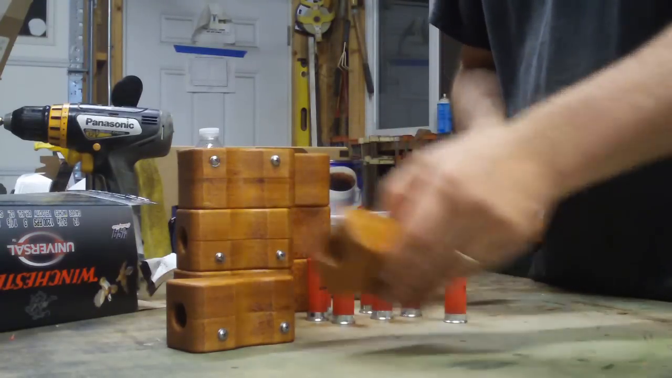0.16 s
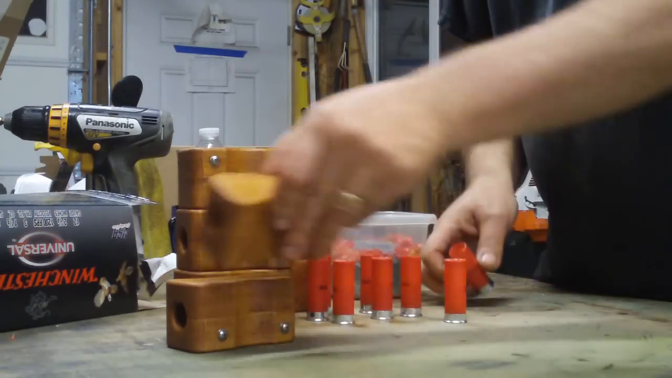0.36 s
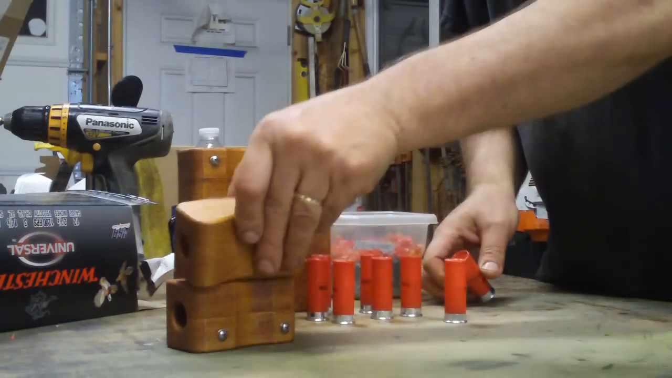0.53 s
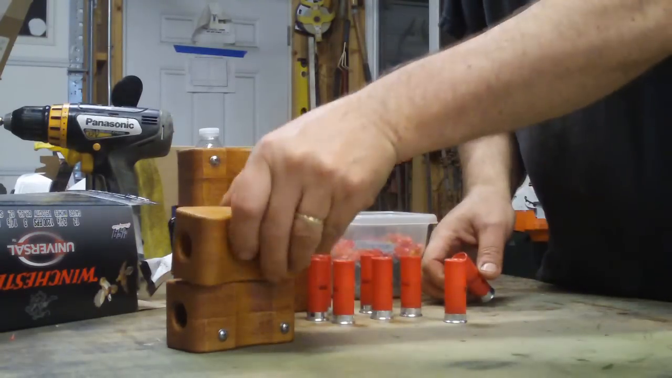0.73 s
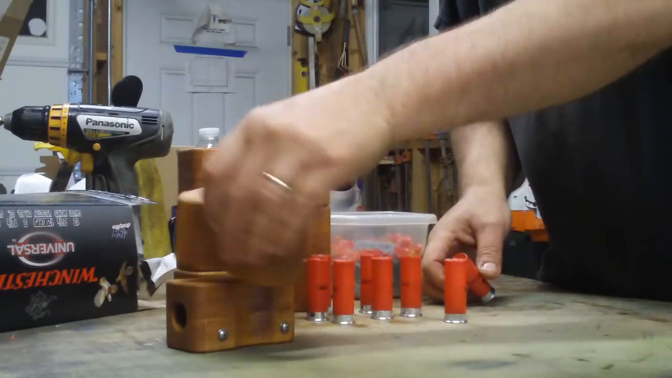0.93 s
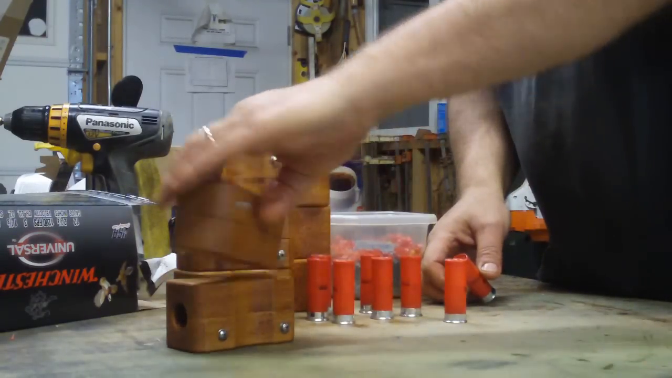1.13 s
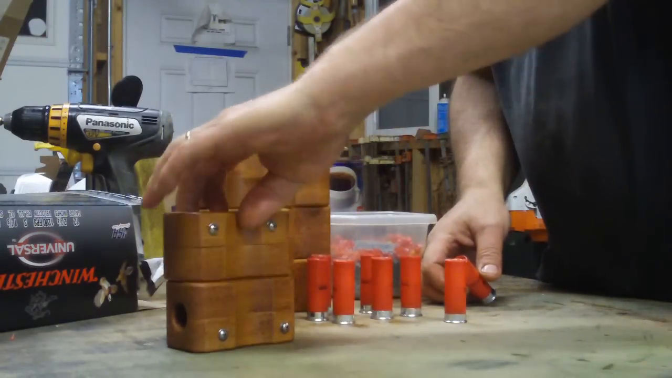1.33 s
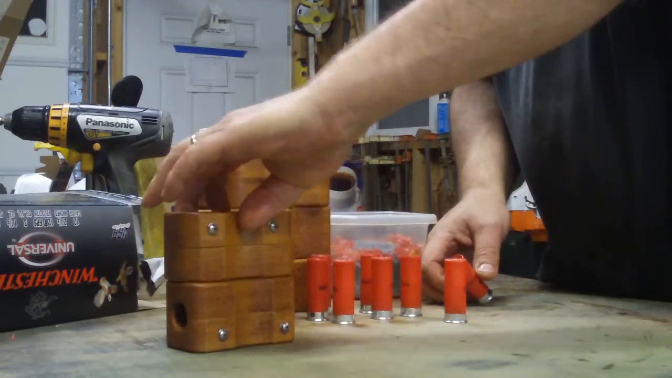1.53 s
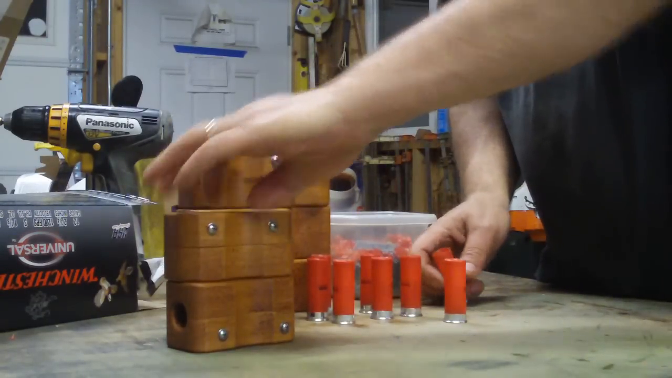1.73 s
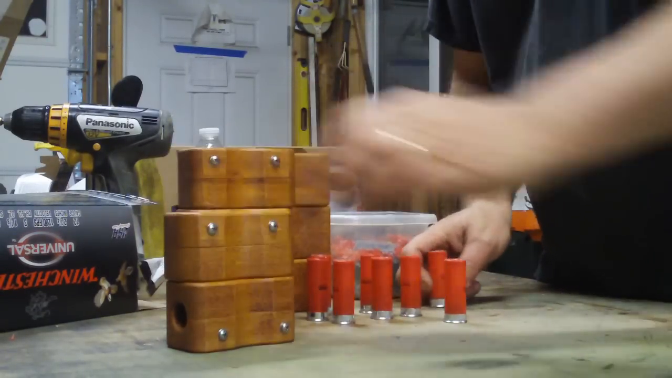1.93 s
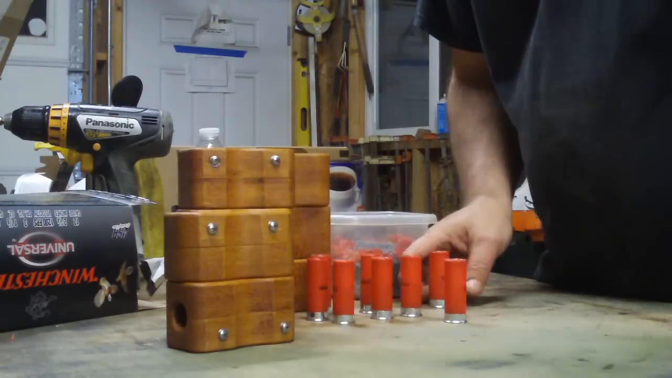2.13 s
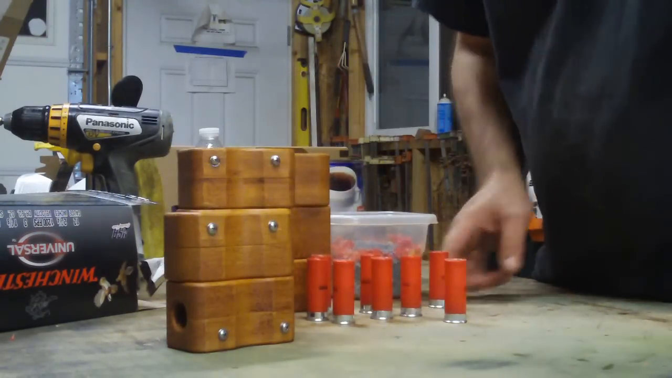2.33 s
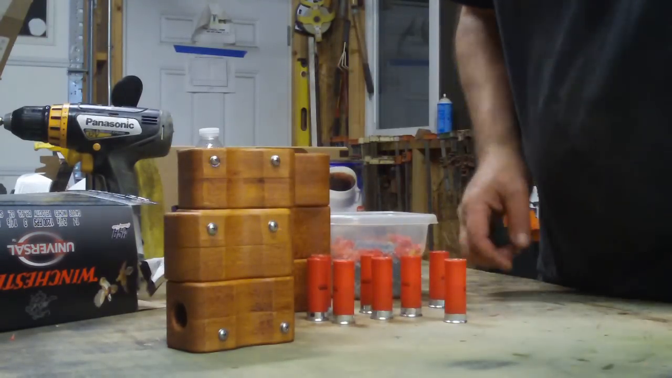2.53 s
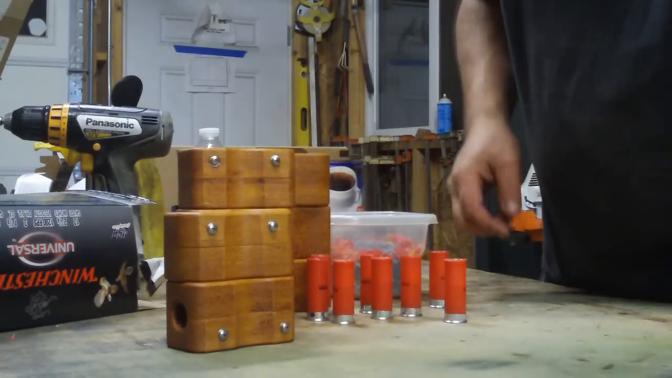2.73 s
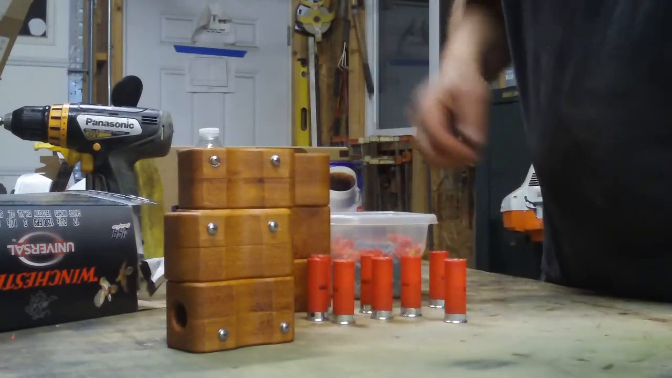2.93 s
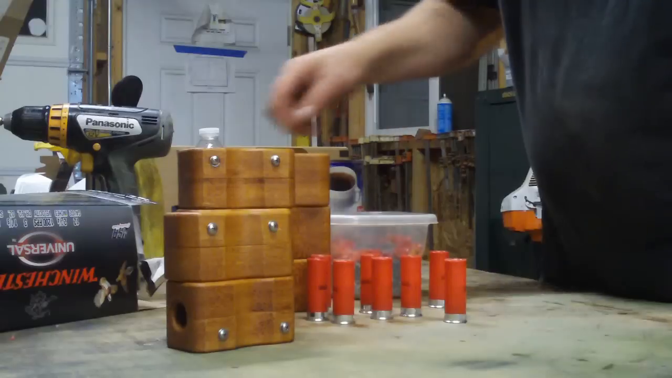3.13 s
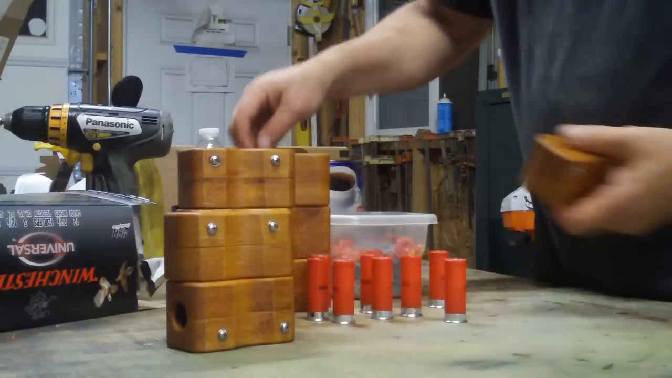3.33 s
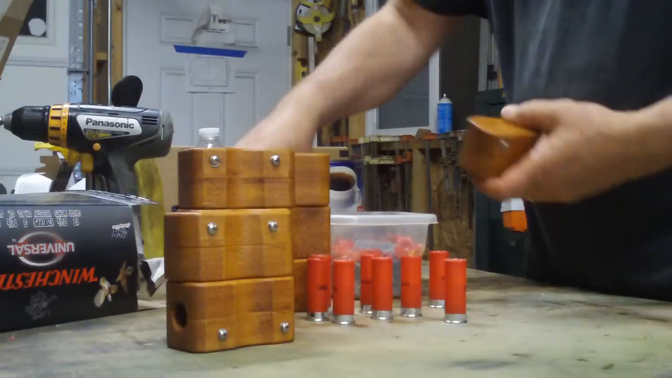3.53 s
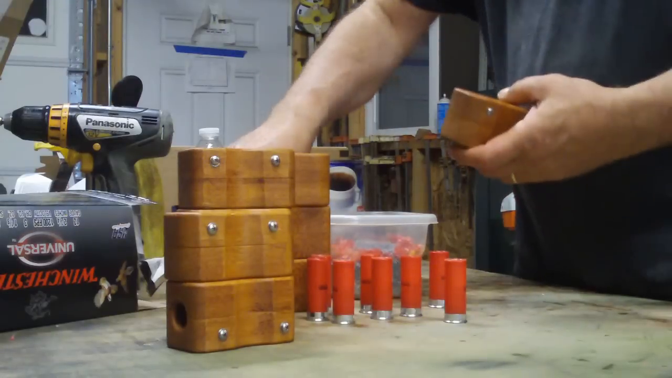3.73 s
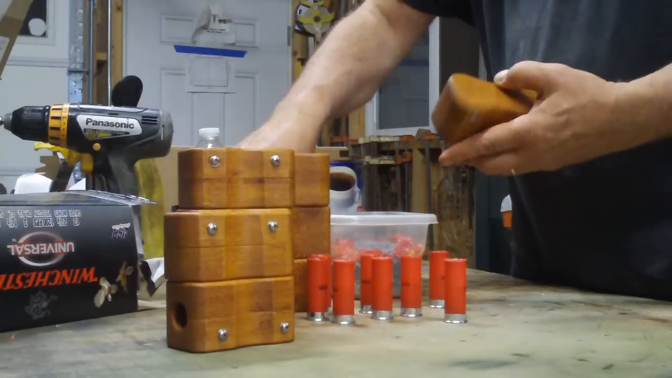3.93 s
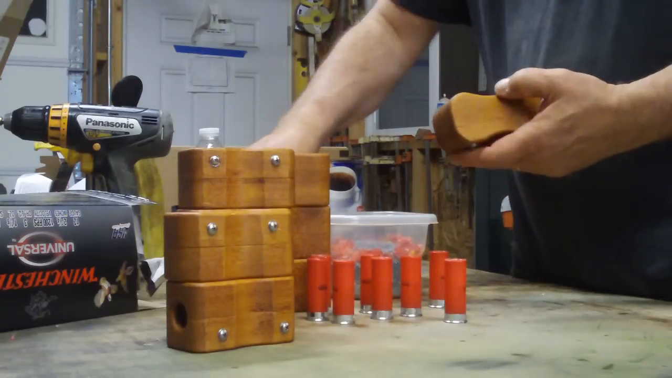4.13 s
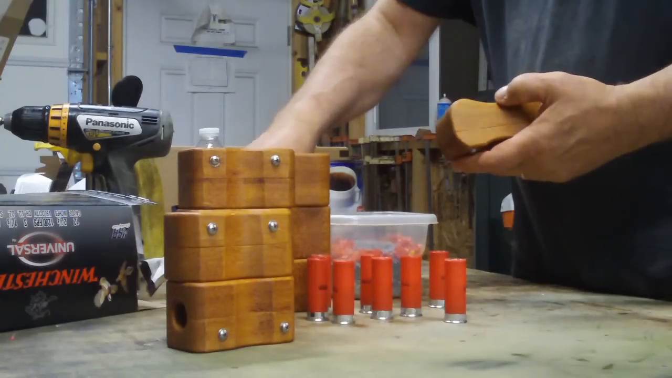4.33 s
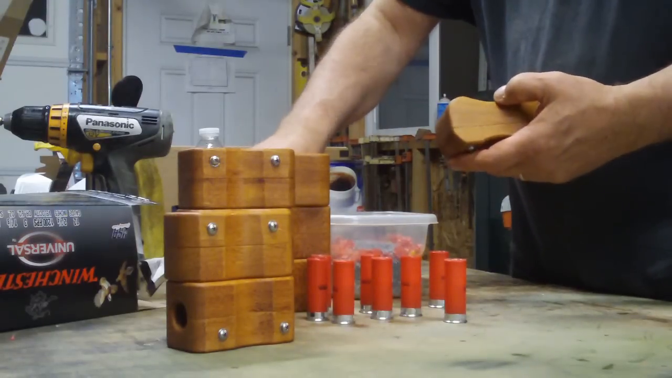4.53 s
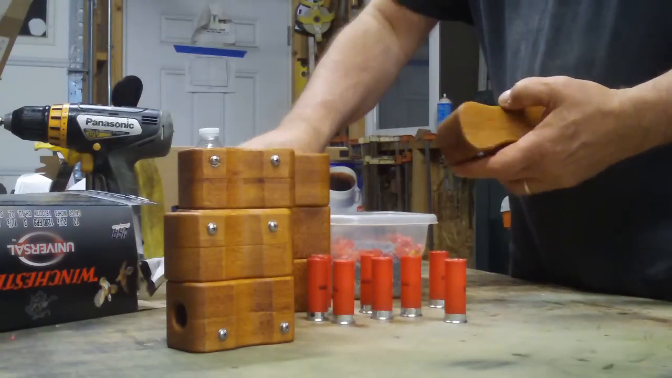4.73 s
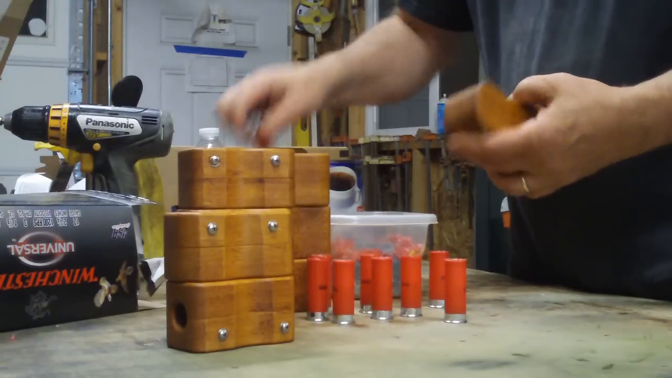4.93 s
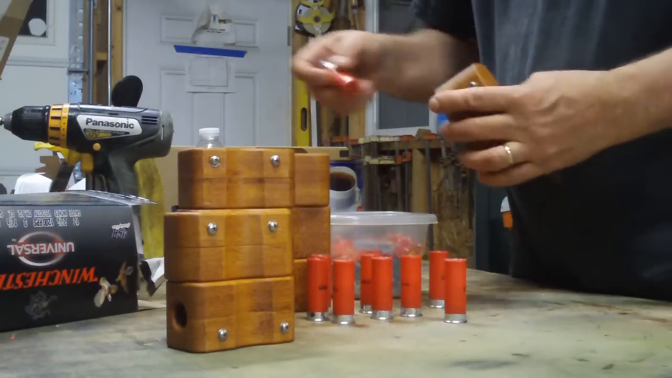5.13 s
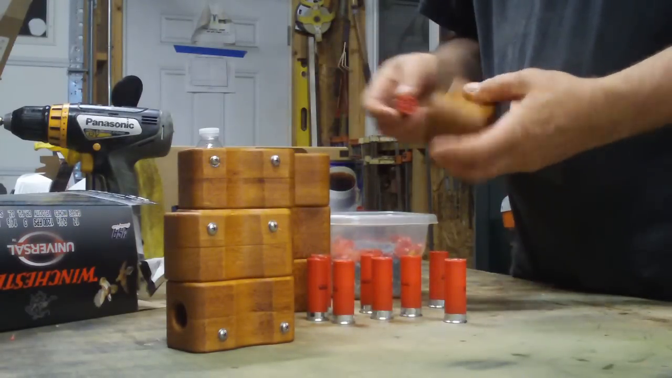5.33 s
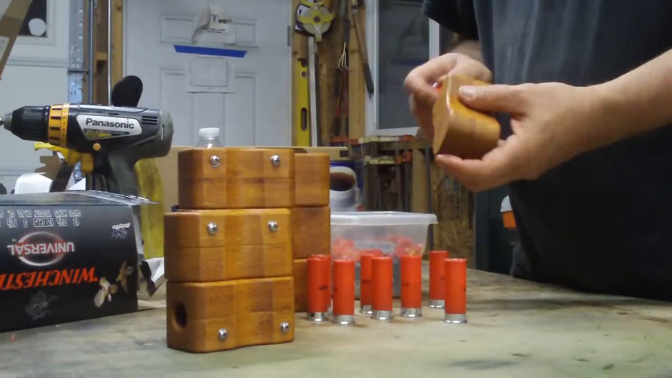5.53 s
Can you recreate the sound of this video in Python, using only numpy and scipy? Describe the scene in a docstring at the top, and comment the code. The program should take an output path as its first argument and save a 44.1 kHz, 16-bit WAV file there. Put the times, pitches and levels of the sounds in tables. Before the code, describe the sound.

Close stereo microphone at a bench in a small workshop. After a quiet start, two dull wooden knocks, then a very loud, sharp block-on-block clack with a quick rebound, short and slightly clipped. A light plastic shell taps down on the bench. Then much quieter: a block drags and bumps off a shelf, fingers rub and rummage in a plastic tub, with faint brass ticks over low room rush.

```python
"""On a workbench, hardwood blocks are stacked: two dull knocks, then a sharp clack and its rebound.
A shotgun shell is stood on the bench, another block is dragged off a shelf, and fingers fish a shell from
a plastic tub. Each blow sums damped modes of the object and the bench, softened by the contact;
sliding is shaped noise. The bench sways, a small workshop answers, and the loudest peaks clip flat."""
import sys
import numpy as np
from scipy import signal
from scipy.fft import rfft, irfft, next_fast_len
from scipy.io import wavfile
from scipy.ndimage import map_coordinates

SR = 44100
rng = np.random.default_rng(int(sys.argv[2]) if len(sys.argv) > 2 else 0)


def unload_audio(sound):
    """Save the sound as a 16-bit wav file, at the path given as the first command line argument."""
    columns = np.transpose(np.atleast_2d(sound))
    # keep every value between -1 and 1, then stretch to whole-number steps
    steps = np.round(np.clip(columns, -1, 1) * 32767)
    wavfile.write(sys.argv[1], SR, steps.astype(np.int16))


N = 245637

# Block striking block: (time [s], level [dB], contact lowpass [Hz], bench level re block [dB],
# bench tilt [dB/octave], room level [dB])
KNOCKS = [(0.6619, -7.5, 1520, -3.5, 1, -8.5), (0.7757, -4.5, 1350, -8.5, 6.5, -8),
          (0.935, -35.5, 900, 2, -2.5, -0.5), (1.3947, -11.5, 9000, -28, 11.5, -8.5),
          (1.3972, 4, 8000, -21, -3.5, -10.5), (1.4394, 1.5, 2820, -23, -2.5, -3.5),
          (1.476, -18, 2200, 0.5, 9, 0)]
# Spectrum of the bench top's low rumble: (frequency [Hz], relative level [dB per Hz])
THUD_SPECTRUM = [(25, -17.5), (45, 0.5), (85, 5.5), (140, -9.5), (250, -16.5), (600, -85)]


def amp(db):
    """Level law: decibels to amplitude gain."""
    return 10 ** (np.asarray(db) / 20)


def unit(x):
    """Power normalization: the signal scaled to rms 1."""
    return x / np.sqrt(np.mean(x ** 2) + 1e-20)


def along(points, hz):
    """Logarithmic frequency scale: (Hz, value) points interpolated on it."""
    f, v = np.transpose(points)
    return np.interp(np.log(hz + 1), np.log(f + 1), v)


def wobble(rate):
    """Slow random modulation: a smooth curve through `rate` random knots a second."""
    knots = rng.standard_normal(int(N * rate / SR) + 4)
    return map_coordinates(knots, [np.arange(N) * rate / SR])


def filtered(x, response):
    """Linear filtering: the spectrum multiplied by a response of frequency."""
    n = x.shape[-1]
    padded = next_fast_len(n + SR // 4)
    spectrum = rfft(x, padded) * response(np.fft.rfftfreq(padded, 1 / SR))
    return irfft(spectrum, padded)[..., :n]


def add(track, s, sound):
    """Superposition: a sound is summed into the track from time s."""
    part = track[..., round(s * SR):][..., :sound.shape[-1]]
    part += sound[..., :part.shape[-1]]


def noise(spectrum):
    """Spectral shaping: white noise coloured by a spectrum, at rms 1."""
    return unit(filtered(rng.standard_normal(N), lambda hz: amp(along(spectrum, hz))))


def swell(s, length, attack, release):
    """Pressure envelope of a hand: it builds, holds and dies away exponentially."""
    t = np.arange(N) / SR - s
    return np.clip(t / attack, 0, 1) * amp(-60 * np.maximum(t - length, 0) / release)


def ring(modes, tilt_db=0, scatter_db=-2.2):
    """Modal superposition: damped sines after one blow, tilted per octave about their middle."""
    t = np.arange(SR // 5) / SR
    hz, db, t60 = np.transpose(modes)[:, :, None]
    octaves = np.log2(hz) - np.log2(hz).mean()
    # each blow excites the modes in slightly different proportions
    level = db + tilt_db * octaves + scatter_db * rng.standard_normal(hz.shape)
    sign = (-1) ** np.arange(len(hz))[:, None]
    return np.sum(sign * amp(level - 60 * t / t60) * np.sin(2 * np.pi * hz * t), axis=0)


def crack(db, t60, edge_hz):
    """High modal density: the crowded, quickly dying modes of a contact behave as decaying noise."""
    t = np.arange(SR // 5) / SR
    lowpass = signal.butter(4, min(edge_hz, SR / 3), fs=SR, output="sos")
    grit = signal.sosfilt(lowpass, rng.standard_normal(len(t)))
    return unit(grit) * amp(db - 60 * t / t60)


def in_room(sound, room_db, scattered=0, build=0.0092, ring_db=-1.5):
    """Reverberation: a sound plus the diffuse echo of part of its ring and of its sideways click."""
    # (frequency [Hz], reverberation time t60 [s])
    room_decay = [(100, 0.6), (400, 0.32), (1200, 0.41), (4000, 0.44), (8000, .15)]
    # (frequency [Hz], echo level [dB])
    room_colour = [(60, -5.5), (200, 0.5), (450, 6.5), (1050, -2.5), (2300, -4), (3300, -8.5), (4900, -5.5),
                   (5300, -42.5), (7000, -24), (12000, -27.5)]
    hz, t, z = signal.stft(rng.standard_normal(SR * 3 // 4), SR, nperseg=256)
    decay = amp(-60 * t / along(room_decay, hz)[:, None])
    fade = decay * (1 - np.exp(-t / build))
    colour = amp(along(room_colour, hz))[:, None]
    tail = signal.istft(z * fade * colour, SR, nperseg=256)[1]
    radiated = amp(ring_db) * sound + scattered
    out = amp(room_db) * signal.fftconvolve(radiated, tail) / np.sqrt(SR / 40)
    add(out, 0, sound)
    return out


def blows(rows, modes, crack_db, crack_t60, crack_hz, click_db, click_hz):
    """Impact excitation: each blow rings the object and the bench; a softer contact is duller."""
    # Bench top modes: (frequency [Hz], level [dB], t60 [s])
    bench_modes = [(143, -5.5, 0.067), (224, 1, 0.075), (356, -1, 0.03), (456, -4, 0.048),
                   (671, -10.5, 0.04), (849.5, -18, 0.14)]
    out = np.zeros(N)
    impulse = amp(click_db) * signal.unit_impulse(SR // 5)
    click = signal.lfilter(*signal.butter(1, min(click_hz, SR / 3), fs=SR), impulse)
    for s, db, bright_hz, bench_db, tilt_db, room_db in rows:
        contact = signal.butter(2, min(bright_hz, SR / 3), fs=SR)
        body = ring(modes) + crack(crack_db, crack_t60, crack_hz)
        body = body + amp(bench_db) * ring(bench_modes, tilt_db)
        body, scattered = signal.lfilter(*contact, [body, click])
        add(out, s, amp(db) * in_room(body, room_db, scattered))
    return out


def seated(rows, bench_db, tilt_db, room_db):
    """Common transmission path: bumps at one spot share their way into the bench and the room."""
    return [(*row, bench_db, tilt_db, room_db) for row in rows]


def block_knocks():
    """Impact of solid wood: short modes ring as block meets block."""
    # (frequency [Hz], level [dB], t60 [s])
    block_modes = [(822, -10.5, 0.013), (1000, -2.5, 0.025), (1132, -2, 0.017), (1274, -9.5, 0.03),
                   (1562, -8, 0.018), (2070, -7, 0.025), (2340, -7.5, 0.0076), (2606, -11, 0.015),
                   (3650, -13.5, 0.017), (3820, -12.5, 0.006), (4650, -25.5, .014), (6500, -39, 0.011),
                   (8700, -28, 0.018), (12400, -24.5, .006)]
    return blows(KNOCKS, block_modes, crack_db=-17.5, crack_t60=0.011, crack_hz=4300,
                 click_db=30.5, click_hz=1550)


def shell_taps():
    """Impact of a light body: shells tap on the bench and in the hand."""
    # (time [s], level [dB], contact lowpass [Hz])
    taps = [(1.745, -44, 2510), (2.0146, -15, 2330), (2.0192, -27.5, 2000), (4.9435, -43.5, 2990),
            (5.519, -51.5, 2500)]
    # (frequency [Hz], level [dB], t60 [s])
    shell_modes = [(940, -9, 0.15), (1250, -8, 0.046), (1608, 0.5, 0.038), (1784, 2.5, 0.052),
                   (2077, 2, 0.039), (2910, -7, 0.046), (3260, 0.5, 0.013)]
    return blows(seated(taps, bench_db=-17, tilt_db=-3, room_db=-8), shell_modes,
                 crack_db=-0.5, crack_t60=0.048, crack_hz=2470, click_db=35.0, click_hz=2000)


def shelf_bumps():
    """Hollow resonance: a block bumping off a shelf excites the shelf's modes."""
    # (time [s], level [dB], contact lowpass [Hz])
    bumps = [(2.869, -27, 1300), (2.883, -30, 1200), (2.897, -24.5, 1800), (2.907, -27, 604)]
    # (frequency [Hz], level [dB], t60 [s])
    shelf_modes = [(349, -9.5, 0.19), (410, -1, 0.021), (680, -16, 0.034), (1120, -11, 0.03),
                   (1427, -7.5, 0.045), (2150, -15, 0.037)]
    return blows(seated(bumps, bench_db=-5, tilt_db=1.5, room_db=-8.5), shelf_modes,
                 crack_db=-30, crack_t60=0.054, crack_hz=3000, click_db=31, click_hz=900)


def tub_bumps():
    """Thin-wall resonance: shells bumping in the plastic tub excite its modes."""
    # (time [s], level [dB], contact lowpass [Hz])
    bumps = [(3.726, -38.5, 2020), (3.746, -35.5, 1990), (4.110, -38.5, 1774), (4.174, -42, 1800),
             (4.2755, -39.5, 4986), (4.381, -39.5, 2500), (4.510, -33, 594), (4.5548, -18.5, 2000),
             (4.5592, -17, 2430), (4.566, -28, 1720), (4.592, -29.5, 600), (5.097, -30, 1390),
             (5.200, -38, 1960)]
    # (frequency [Hz], level [dB], t60 [s])
    tub_modes = [(451, -9.5, 0.15), (530, -10, 0.097), (813, -4, 0.08), (900, -4, 0.013), (1124, -2, 0.04),
                 (1414, -4.5, 0.036), (1840, -6.5, 0.024), (2500, -17, 0.057)]
    return blows(seated(bumps, bench_db=-11, tilt_db=0, room_db=-12.5), tub_modes,
                 crack_db=-4.5, crack_t60=0.06, crack_hz=2400, click_db=42.5, click_hz=1900)


def clinks():
    """Cushioned metal impact: brass heads tick, each pitched a little apart, their onset softened by the hull."""
    # (time [s], level [dB])
    ticks = [(4.548, -28), (4.561, -22.5), (4.567, -24.5), (4.595, -33.5), (4.74, -29), (4.754, -35.5),
             (4.764, -33), (4.779, -31), (5.144, -26.5), (5.160, -33), (5.176, -41), (5.530, -42)]
    # (frequency [Hz], level [dB], t60 [s])
    brass_modes = [(3630, 3.5, 0.015), (3980, -6.5, 0.021), (3856, -14.5, 0.055), (4260, -9.5, 0.04),
                   (4564, -5, 0.028)]
    attack_s, detune = 0.00073, 0.025  # time constant of the rise; relative spread of pitch
    out = np.zeros(N)
    for (s, db), chance in zip(ticks, rng.standard_normal(len(ticks))):
        modes = [(hz * (1 + detune * chance), level, t60) for hz, level, t60 in brass_modes]
        tick = ring(modes, scatter_db=3)
        tick *= 1 - np.exp(-np.arange(len(tick)) / SR / attack_s)
        add(out, s, amp(db) * in_room(tick, room_db=2))
    return out


def handling():
    """Friction noise: skin and wood slide in uneven little catches while the bench top rumbles."""
    # (time [s], length [s], rub level [dB], scratch level [dB], rumble level [dB])
    strokes = [(0.872, 0.11, -66, -66, -46.5), (1.694, 0.15, -41, -70, -61), (2.70, 0.071, -57, -73, -38.5),
               (2.765, 0.077, -44, -64, -50.5), (2.854, 0.043, -40.5, -59, -41),
               (3.608, 0.15, -48, -58.5, -40), (3.766, 0.74, -49.5, -64, -54),
               (4.102, 0.13, -47, -60.5, -45), (4.31, 0.074, -44, -57, -61),
               (4.494, 0.1, -38.5, -53.5, -38.5), (4.694, 0.078, -41, -48, -49),
               (4.794, 0.18, -47.5, -59.5, -59), (5.074, 0.086, -40, -52.5, -44.5),
               (5.148, 0.08, -51, -64, -48), (5.507, 0.031, -41, -52, -46)]
    # (frequency [Hz], relative level [dB per Hz])
    rub_spectrum = [(100, -27), (220, -3.5), (360, 2.5), (520, -3), (750, -8), (1100, -5), (1500, -10),
                    (2400, -20.5), (4500, -53), (5500, -88)]
    # (frequency [Hz], relative level [dB per Hz])
    scratch_spectrum = [(1000, -36), (2000, 5.5), (3000, 1.5), (3900, 9), (4800, 6.5), (5300, -50),
                        (7000, -100)]
    attack_s, release_s = 0.019, 0.19
    power = sum(np.outer(amp(levels), swell(s, length, attack_s, release_s)) ** 2
                for s, length, *levels in strokes)  # overlapping strokes add in power
    rub, scratch, rumble = np.sqrt(power)
    catches = unit(amp(2.87 * wobble(70) + 2.26 * wobble(400)))  # level fluctuation in dB
    sliding = rub * noise(rub_spectrum) + scratch * noise(scratch_spectrum)
    return catches * sliding + rumble * noise(THUD_SPECTRUM)


def bench_motion():
    """Damped oscillator: knocks set the bench rocking and booming, and a leaning hand keeps it trembling."""
    # Hand leaning on bench or tub: (time [s], length [s], tremble level [dB])
    leans = [(1.8, 0.85, -41), (3.674, 0.64, -36), (4.06, 0.27, -31.5), (4.48, 0.472, -32),
             (5.04, 0.52, -38)]
    rock_hz, rock_width_hz, rock_db, rock_t60_s = 23.77, 11.8, -35, 2.64  # level re knock
    boom_db, boom_t60_s = -33, 0.63  # level re knock
    t = np.arange(N) / SR
    rocking, boom_power = np.zeros(N), np.zeros(N)
    for s, db, *_ in KNOCKS:
        sway = np.sin(2 * np.pi * rock_hz * t)
        add(rocking, s, amp(db + rock_db - 60 * t / rock_t60_s) * sway)
        add(boom_power, s, amp(db + boom_db - 60 * t / boom_t60_s) ** 2)

    def legs(hz):
        """Resonance response of the bench on its legs."""
        damping = 1j * hz * rock_width_hz
        return damping / (rock_hz ** 2 - hz ** 2 + damping)

    tremble = unit(filtered(rng.standard_normal(N), lambda hz: legs(hz) ** 2))
    weight = sum(amp(db) * swell(s, length, attack=0.04, release=0.25) for s, length, db in leans)
    return rocking + weight * tremble + np.sqrt(boom_power) * noise(THUD_SPECTRUM)


def bell_pulses(rows):
    """Windowing: one-sided raised-cosine pulses, one for each (time [s], level [dB], length [s])."""
    out = np.zeros(N)
    for s, db, length in rows:
        add(out, s, amp(db) * np.hanning(int(length * SR)))
    return out


def low_pulses():
    """Unipolar pulses: short, low and one-sided, mostly around the loud knocks and the shell tap."""
    # (time [s], level [dB], length [s])
    pulses = [(0.763, -22, 0.007), (1.39, -21, 0.0069), (1.845, -20, 0.016), (1.994, -20, 0.0049),
              (1.996, -22.5, 0.02), (2.029, -20.5, 0.011), (2.038, -21, 0.006), (5.366, -26.5, 0.025)]
    return bell_pulses(pulses)


def side_bursts():
    """Antiphase noise: short low bursts, opposite in the two channels, around the loud sounds."""
    # (time [s], level [dB], length [s])
    bursts = [(0.659, -32.5, 0.013), (0.758, -22.5, 0.035), (1.387, -17, 0.025), (1.988, -22.5, 0.063),
              (4.545, -25.5, .022)]
    # (frequency [Hz], relative level [dB per Hz])
    burst_spectrum = [(30, -0.5), (120, -3.5), (300, -8), (700, -16), (1200, -26.5), (3000, -22),
                      (4800, -44.5), (6000, -70.5)]
    return bell_pulses(bursts) * noise(burst_spectrum)


def dull(x, leak_db):
    """Steep lowpass response: only a faint leak passes above the edge."""
    edge_hz = 4950
    return filtered(x, lambda hz: amp(leak_db) + 1 / (1 + (hz / edge_hz) ** 60))


def air():
    """Stationary noise: the workshop's steady, dull background rush as mid and side."""
    # (frequency [Hz], relative level [dB per Hz])
    air_spectrum = [(12, -37), (20, 7.5), (64, -16.5), (125, -6), (158, -19), (185, -8.5), (273, -15),
                    (293, -9), (569, -14), (653, -11.5), (767, -15.5), (964, -15), (1960, -20), (4800, -33),
                    (6240, -77.5), (10600, -120)]
    # (frequency [Hz], side level re mid [dB])
    side_balance = [(30, -14), (80, -5), (200, -12), (600, -6), (850, -33.5), (4800, -31)]
    rush = np.array([noise(air_spectrum), noise(air_spectrum)])
    mid, side = amp(-46.0) * dull(rush, leak_db=-40.5)
    return mid, filtered(side, lambda hz: amp(along(side_balance, hz)))


def scene():
    """Mid-side superposition: objects in the middle; side bursts, a faint echo and the air spread sideways."""
    blocks = block_knocks()
    small_sounds = shell_taps() + shelf_bumps() + tub_bumps() + clinks() + handling()
    objects = blocks + dull(small_sounds, leak_db=-33.5)
    air_mid, air_side = air()
    side_walls = in_room(objects, room_db=-29)[:N] - objects  # the echo alone
    mid = objects + bench_motion() + low_pulses() + air_mid
    side = side_bursts() + side_walls + air_side
    return np.array([mid + side, mid - side]) * amp([[.15], [-.15]])  # channel trim in dB


def record(dry):
    """Amplitude limiting: channels on opposite steady offsets clip flat, then are band-limited."""
    offset, top_hz = .065, 15600  # offset as a fraction of full scale
    clipped = np.clip(dry + [[offset], [-offset]], -1, 1)
    return filtered(clipped, lambda hz: hz < top_hz)


dry = scene()
out = record(dry)
unload_audio(out)
```